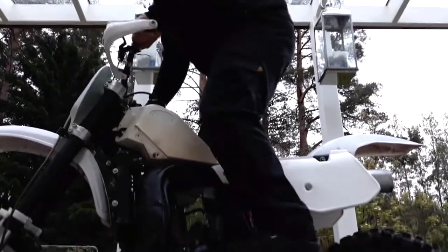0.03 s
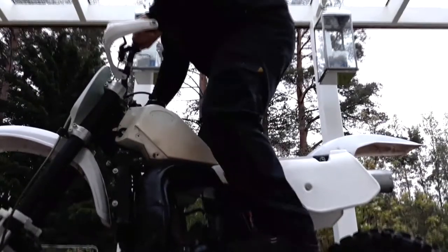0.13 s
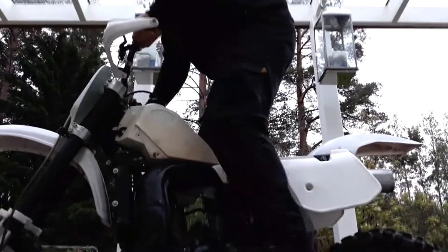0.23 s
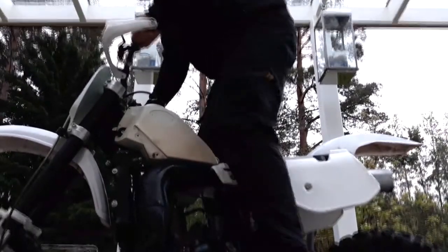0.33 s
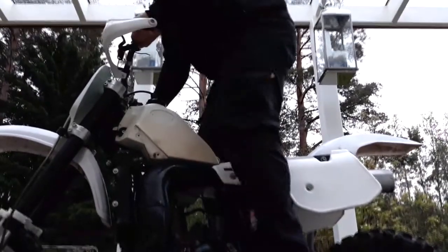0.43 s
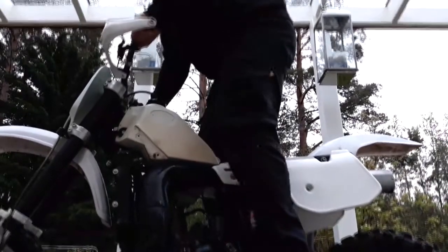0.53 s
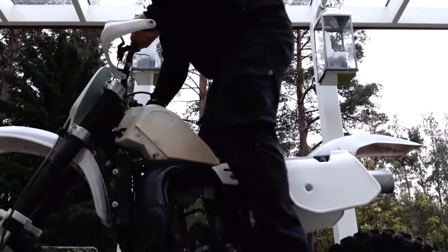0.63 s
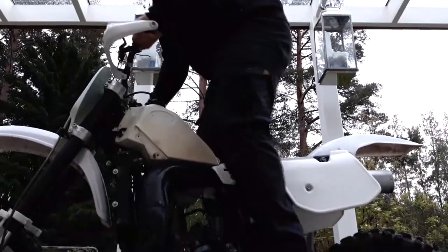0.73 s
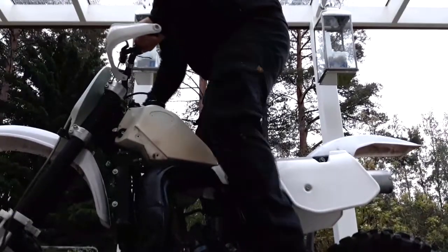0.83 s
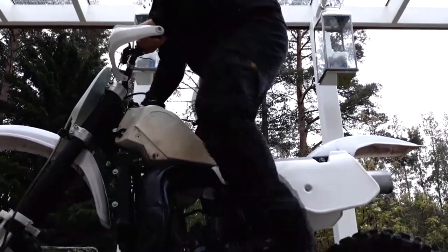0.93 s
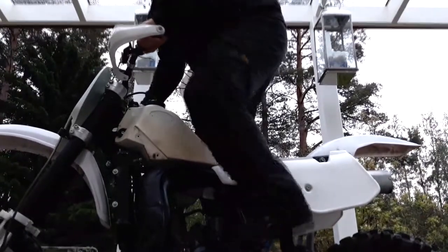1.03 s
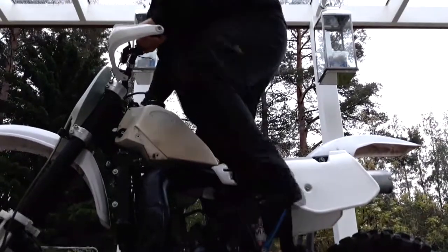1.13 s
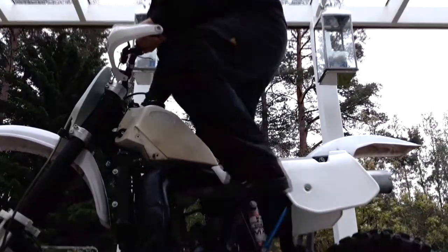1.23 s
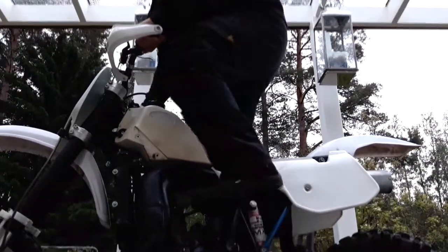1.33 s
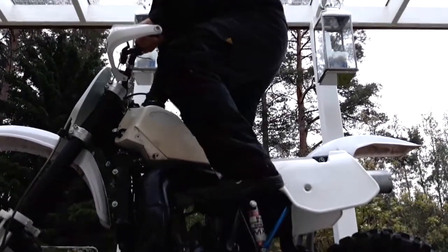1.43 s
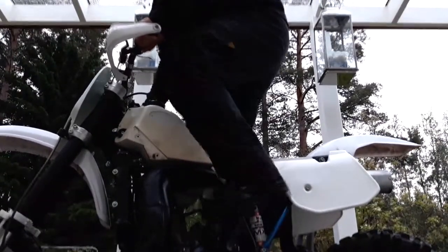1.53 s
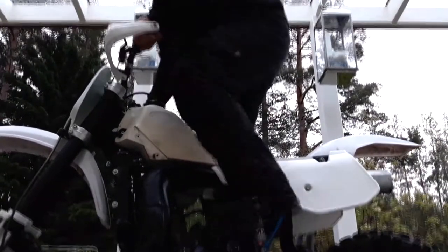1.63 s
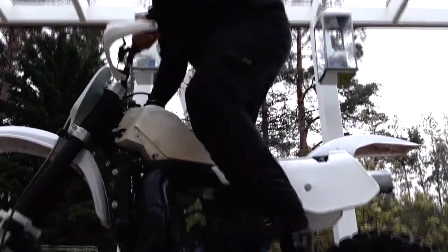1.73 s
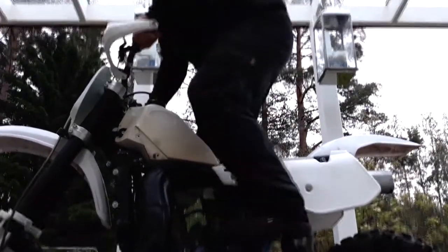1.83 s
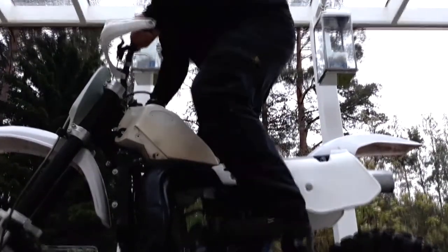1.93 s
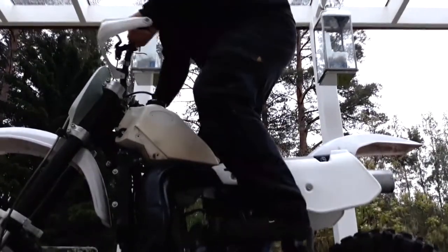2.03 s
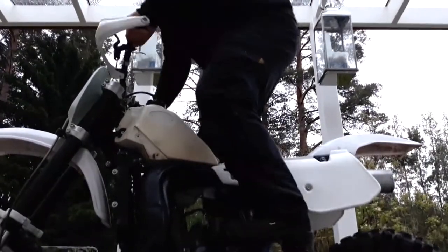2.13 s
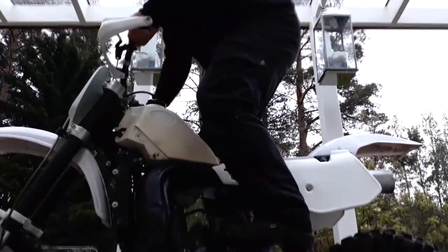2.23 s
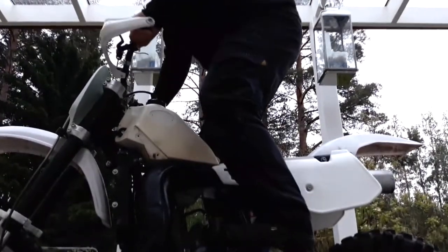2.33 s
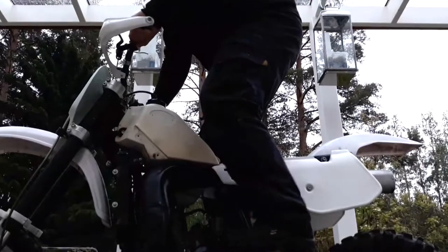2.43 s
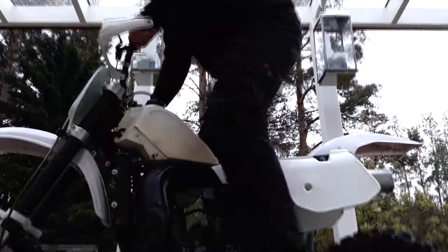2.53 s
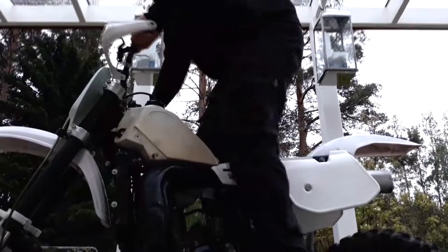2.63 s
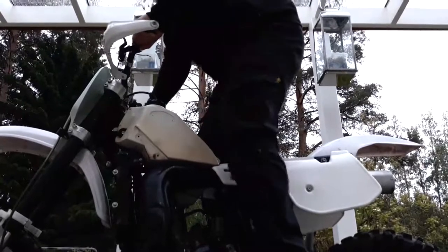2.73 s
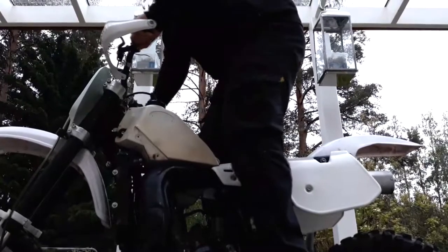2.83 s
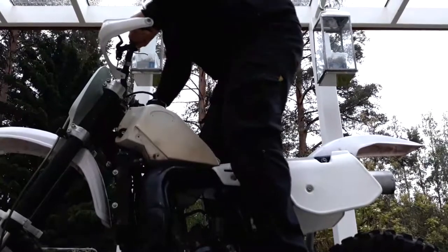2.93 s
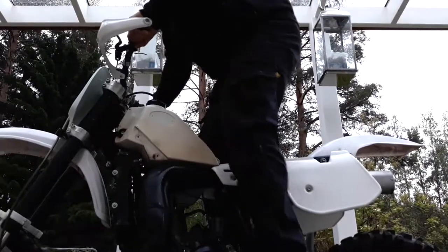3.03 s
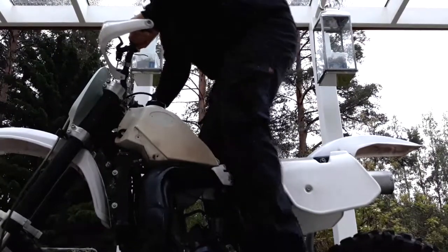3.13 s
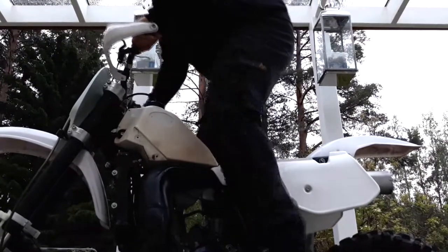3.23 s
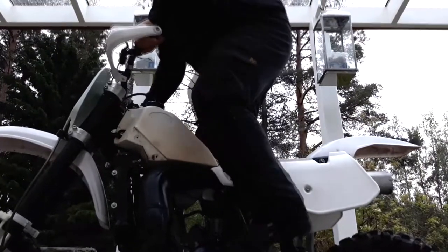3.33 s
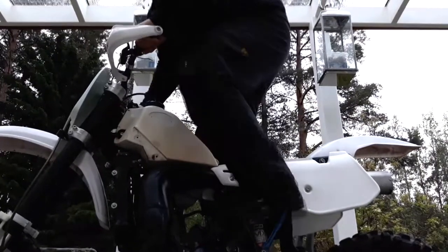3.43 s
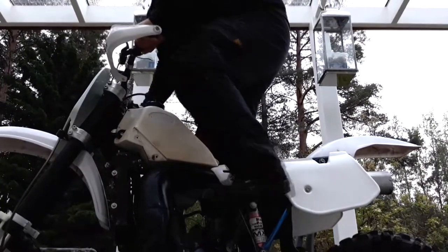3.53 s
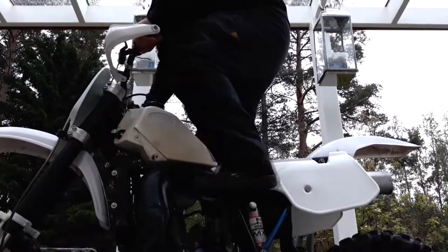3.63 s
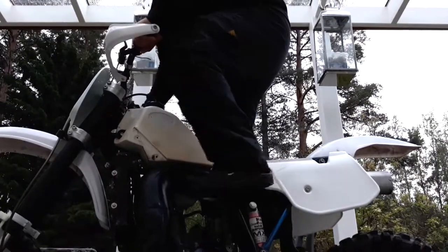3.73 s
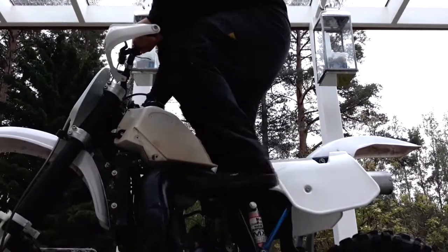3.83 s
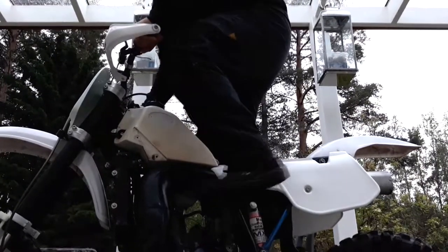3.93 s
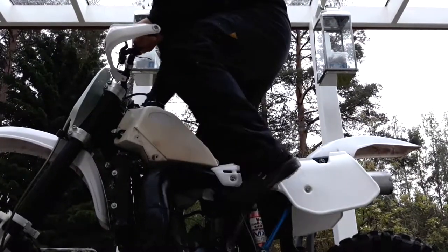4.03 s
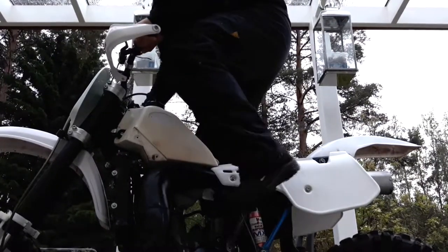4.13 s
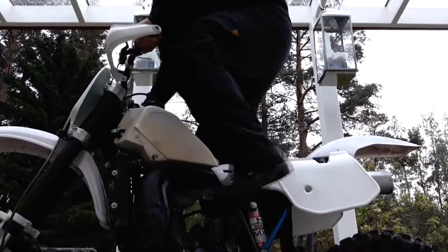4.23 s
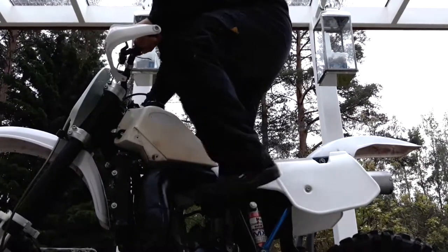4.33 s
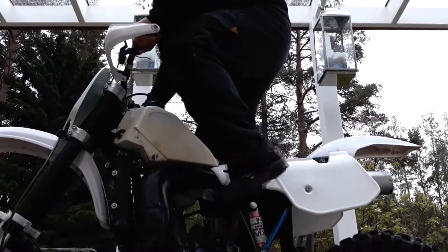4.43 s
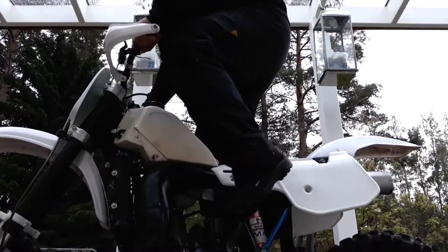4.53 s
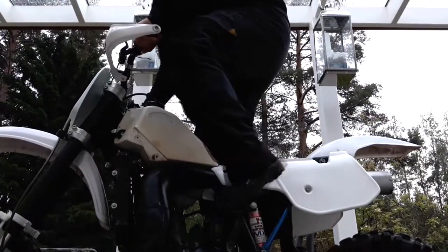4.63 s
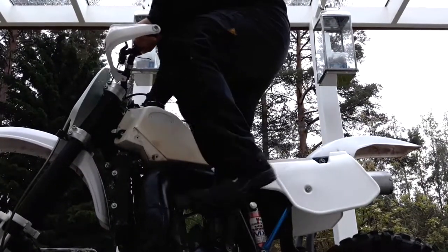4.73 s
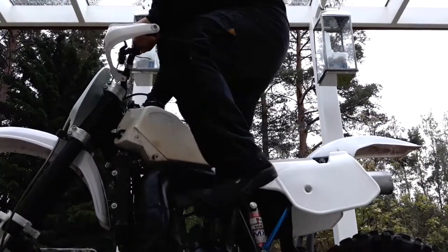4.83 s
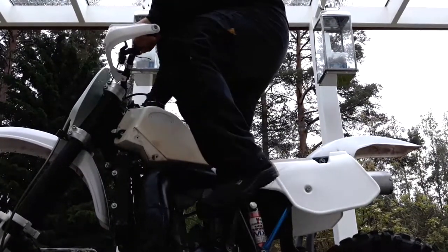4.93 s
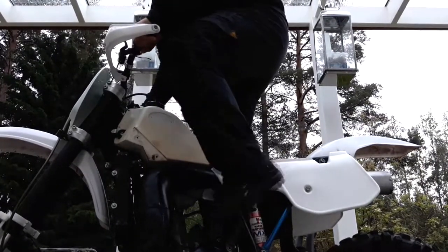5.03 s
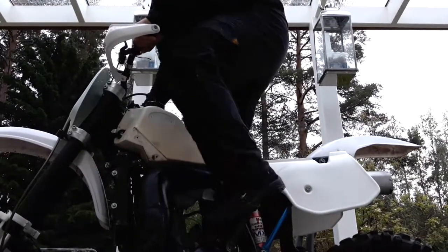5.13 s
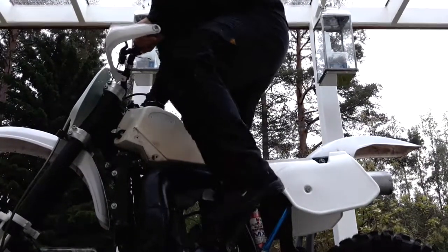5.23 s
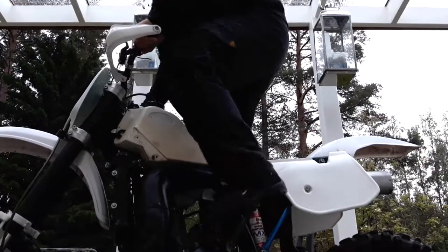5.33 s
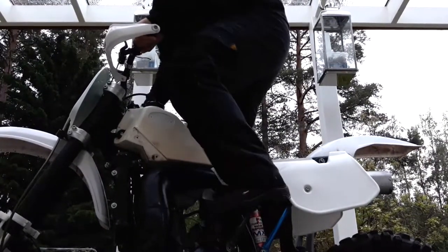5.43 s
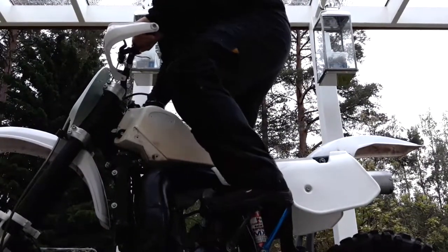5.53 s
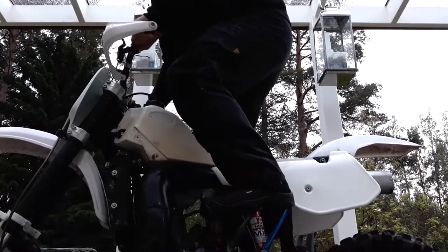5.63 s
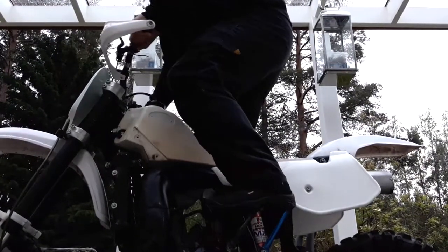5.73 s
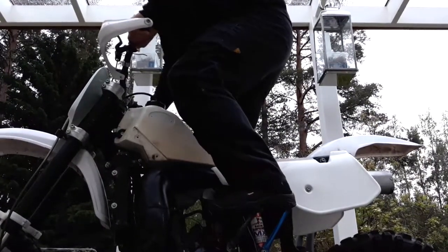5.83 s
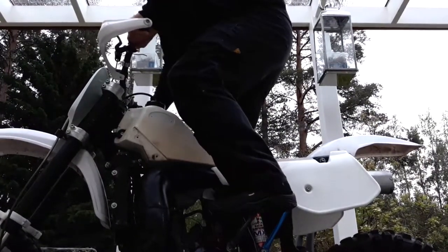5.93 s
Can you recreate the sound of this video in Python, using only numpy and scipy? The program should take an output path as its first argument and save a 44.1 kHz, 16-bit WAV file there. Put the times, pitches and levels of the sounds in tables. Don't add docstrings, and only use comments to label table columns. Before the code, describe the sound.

Two failed kick-starts of a motorbike thump and grind, with sharp metallic ratchet clacks between and after them in a quiet garden.

```python
import sys
import numpy as np
from scipy import signal
from scipy.fft import rfft, irfft, next_fast_len
from scipy.io import wavfile
from scipy.ndimage import uniform_filter1d

SR = 44100
rng = np.random.default_rng(int(sys.argv[2]) if len(sys.argv) > 2 else 0)


def to_linear_factor(level_db):
    exponent = np.asarray(level_db, float) / 20
    return 10 ** exponent


def inscribe(sig):
    pcm = np.round(np.clip(np.atleast_2d(sig).T, -1, 1) * 32767)
    wavfile.write(sys.argv[1], SR, pcm.astype(np.int16))


N = 263277

# [t/s, level/dB]
BREEZE = [(0, -61.5), (.27, -59.5), (.5, -75), (.71, -62.5), (1.13, -61.5), (1.35, -63), (1.58, -67.5),
          (1.901, -65), (2.44, -64.5), (2.96, -61), (3.539, -62), (3.74, -64), (4.04, -61.5), (4.2, -65),
          (4.7, -58.5), (4.87, -64.5), (5.14, -56.5), (5.299, -59.5), (5.97, -59)]
# [peak t/s, rustle level/dB, hum level/dB, swell/s]
SHIFTS = [(0.0, -46, -46.5, 0.46), (.42, -39, -33, 0.51), (.56, -51.5, -57, 0.94), (.91, -53, -61.5, 1.16),
          (1.23, -51, -56, 0.72), (1.63, -57, -57.5, 0.2), (1.73, -50.5, -59.5, 0.96),
          (2.0, -60.5, -61, 1.5), (2.639, -35, -41, 0.36), (2.74, -42, -38.5, 0.72),
          (2.92, -57, -54.5, 0.43), (3.13, -50, -60, 0.58), (3.47, -50, -50.5, 1.03),
          (3.62, -44, -47, 0.33), (4.041, -47, -60, 0.43), (4.14, -56.5, -54.5, 1.6),
          (4.32, -52, -52, 0.94), (4.591, -44, -51, 0.29), (4.744, -52, -49.5, 0.42),
          (5.14, -46, -44, 0.48), (5.401, -61, -78.5, 9.1), (5.97, -51, -61, 1.86)]
# [f/Hz, density/dB per Hz]
HUM_SPECTRUM = [(15, -57), (25, -1.5), (70, -4.5), (92, -1.5), (150, -8), (172, -10), (223, -13.5),
                (250, -19), (320, -36.5), (550, -120)]
RUSTLE_SPECTRUM = [(120, -34), (200, -16.5), (312, -1.5), (357, -7.5), (577, -4), (1400, -11), (2000, -19),
                   (2600, -30.5), (4400, -120)]
AIR_SPECTRUM = [(880, -37.5), (1500, -14.5), (1830, -6.5), (2300, -6), (2750, -13), (3300, -4.5),
                (4520, -5), (8510, -17.5), (9410, -31), (15100, -26), (16000, -21.5), (16500, -47)]

# [peak t/s, gear level/dB, rise/s, t60/s, rattle over gears/dB]
SURGES = [(0.281, -17, 0.034, 0.026, -13.5), (0.296, -10.5, 0.045, 0.29, -8),
          (0.325, -14.5, 0.038, 0.1, -12), (0.37, -25, 0.17, 0.13, -1.5), (0.441, -26, 0.73, 0.04, -15),
          (0.559, -52, 0.27, .5, 4.5), (1.583, -39, 0.012, 0.28, 5.5), (1.77, -32, 0.16, 0.27, -4),
          (2.524, -26, 0.05, 0.042, -21), (2.535, -16.5, 0.071, 0.54, -9), (2.572, -20, 0.042, 0.32, -9.5),
          (2.614, -27.5, 0.2, 0.084, 8), (2.675, -35, .1, 0.42, 2.5),]
# [peak t/s, level/dB, rise/s, t60/s]
HEAVES = [
    (.283, -27, .02, .25),
    (.34, -35, 0.3, 0.07),
    (.43, -31.5, 0.06, 0.15),
    (.56, -41, 0.36, 0.49),
    (1.658, -29.5, 0.21, 0.11),
    (2.528, -32.5, 0.02, 0.57),
    (2.66, -38, 0.3, 0.1),
    (2.75, -39, .4, 0.19),
]
# [f/Hz, density/dB per Hz]
RUMBLE_SPECTRUM = [(15, -66), (25, 1.5), (54, -45), (73, -1.5), (113, 5), (188, -10), (227, 13.5),
                   (447, -5.5), (482, -15), (500, -28), (650, -28.5), (1100, -120)]
GEAR_SPECTRUM = [(210, 0.5), (350, -0.5), (670, -3), (1160, -9.5), (1460, -10), (2040, -13.5),
                 (2230, -35.5), (2500, -14.5), (3250, -45), (5500, -120)]
RATTLE_SPECTRUM = [(1060, -40), (1800, -22), (2220, -1), (2640, -6), (3910, -4.5), (4290, -3), (5640, -9.5),
                   (6180, -10), (10400, -22), (16000, -22)]

# [t/s, peak level/dB, weight/dB, brightness/dB, crack/dB]
RATCHET = [(1.076, -24.5, -21, -18, -0.5), (1.1199, -6.5, -19.5, -17.5, 5.5), (1.2197, 0, -25.5, -22.5, 1),
           (1.5273, -32, -28, -33, -2.5), (1.5851, -14.5, -16, -49, 1.5), (1.948, -27.5, -30, -17, -8.5),
           (1.9587, -34.5, -30, -19, 3), (3.291, -20, -10, -24.5, 3.5), (3.3026, -14, -18, -30, -5),
           (3.386, -5, -22.5, -18, 1.5), (3.473, -2.5, -22.5, -15.5, 3.5), (3.5608, -1, -23.5, -22, 3),
           (3.6414, -30, -2, -12, 3), (3.6494, -23.5, -8.5, -22.5, 2), (4.0112, -21, -32, -26, 0.5),
           (4.0675, -15, -16.5, -22, 0), (4.2159, -24, -17.5, -35, -2.5), (4.2738, -36, -10, -22, 2.5),
           (4.3042, -26.5, -17, -24, 3), (4.5279, -17.5, -3, -16, -4), (4.6459, -21, -20, -25, 0.5),
           (5.086, -14.5, -18, -13, -3)]
# [t/s, peak level/dB, weight/dB, brightness/dB]
SLAMS = [
    (0.2662, -23.5, -0.5, -19),
    (0.287, -10, -18.5, -4.5),
    (0.425, -24, -24, -32),
    (0.442, -17, -15, -21),
    (2.5285, -9.5, 3, -4),
    (2.5426, -14.5, 3.5, -17),
    (2.5906, -38, -7, -19),
    (2.6086, -13, -18, -45),
]
# [t/s, peak level/dB, weight/dB]
TICKS = [(0.18, -43, -14.5), (0.661, -31.5, -30), (0.8019, -37, 4), (1.449, -42.5, -24), (2.9439, -30, -36),
         (3.0792, -37, -5), (3.134, -32, -17), (3.963, -36, -3.5), (4.437, -30, -30)]
# [t/s, favoured f/Hz, its gain/dB, main mode gain/dB]
STRUCK = [(.4424, 4330, 0.5, 4), (.6617, 3280, 9.5, -11), (.8017, 2180, 10, -8), (1.076, 2220, 11, -11.5),
          (1.1202, 1960, 4, 3), (1.2196, 3680, 4.5, 3), (1.5273, 2200, 10.5, -4), (1.5849, 3100, 5, -6),
          (1.948, 3900, 3.5, -6), (1.9585, 3500, 11, -6), (2.6087, 3280, 11.5, -1), (2.9455, 3980, 2, -8),
          (3.0812, 2200, 6, 4), (3.134, 1700, 6, -3), (3.2911, 1280, 7, -5), (3.3861, 3640, 5.5, 1.5),
          (3.473, 4870, 5.5, -4), (3.5609, 2100, -0.5, -1.5), (4.0111, 4840, 1.5, 6),
          (4.0675, 3080, 7.5, 1), (4.2155, 2540, 4, -3), (4.3042, 1580, 7, -9), (4.5281, 5500, 5.5, -3),
          (4.6459, 3640, 5, -2), (5.086, 3200, 5, -4)]
# [f/Hz, width/Hz, level/dB]
BLOW_MODES = [(1522, 390, -7), (2030, 450, -5), (2680, 373, -0.5), (3896, 210, 0.5), (4270, 330, -4),
              (4850, 370, -2.5), (5200, 690, -9.5), (6126, 300, -8.5), (8140, 1200, -18), (10800, 720, -22),
              (12600, 1200, -24), (14800, 1100, -26)]
# [f/Hz, width/Hz, level/dB]
LEVER_MODES = [(1450, 90, -11), (2080, 90, -5), (2205, 50, -3), (2468, 70, -2), (2750, 120, -8),
               (3225, 90, -11), (3690, 100, -7), (4265, 55, 4), (4370, 70, 1), (4480, 90, -5),
               (5200, 120, -9)]
# [f/Hz, level under the blow/dB, t60/s]
LEVER_NOTES = [(2060, -32.5, .12), (2340, -29.5, 0.22), (2480, -21.5, 0.14), (3460, -32.5, 0.091),
               (4272, -27.5, 0.25), (4285, -32, 0.066), (5220, -30.5, 0.11), (8130, -33, .13)]
# [f/Hz, density/dB per Hz]
CASE_SPECTRUM = [(88, -44.5), (150, -15), (354, -4.5), (675, -8.5), (1310, -5.5), (1940, -8.5),
                 (2500, -8.5), (3220, -10), (4240, -4.5), (5680, -19), (9400, -30.5), (11600, -27.5),
                 (13500, -31), (16000, -32.5)]
# [t/s, level/dB, f/Hz,
# t60/s]
PINGS = [(0.285, -12, 5200, 0.032), (0.2845, -24.5, 6890, 0.13), (.362, -22, 2210, 0.051),
         (2.527, -14, 6960, 0.055), (2.5275, -12, 5260, 0.028), (2.588, -15.5, 2190, 0.053),
         (2.607, -12.5, 4180, 0.038), (0.444, -34, 4340, 0.12), (2.527, -26.5, 3290, 0.1),
         (2.54, -23, 2410, .03), (2.545, -26, 4430, 0.087), (3.39, -24.5, 4290, 0.11),
         (3.565, -26.5, 4280, 0.14), (3.644, -40, 4350, 0.22), (4.22, -46, 4280, .3),
         (4.304, -48, 4300, 0.12), (4.438, -50, 4270, 0.2), (4.535, -47, 4280, .25),
         (1.077, -29.5, 4830, 0.026), (1.122, -20, 6130, 0.014), (.37, -33, 5050, .06),
         (.424, -26, 1500, .02), (1.595, -25.5, 4300, 0.082), (3.3, -36, 4285, 0.22),
         (3.474, -22, 4340, 0.18), (4.07, -36, 4270, .12), (5.086, -19.5, 5520, 0.024),
         (.26, -24, 1000, 0.06), (2.501, -21, 980, 0.13), (4.0107, -7, 2300, 0.006),
         (4.4258, -29.5, 2240, 0.014), (5.509, -53.5, 600, 0.027), (5.55, -41, 313, 0.12),
         (5.712, -54.5, 1794, 0.2), (5.936, -39, 455, 0.073)]

# [t/s, peak level/dB, centre f/Hz, t60/s, bright part/dB]
KNOCKS = [(0.26, -21, 910, 0.43, -12), (0.701, -31, 700, 0.32, -6), (0.889, -38.5, 590, 0.37, -6),
          (2.009, -35, 740, 0.31, -5), (2.163, -40, 750, 0.34, -4), (2.3, -49.5, 870, 0.6, -15),
          (2.375, -43, 744, 0.28, -16), (2.502, -22.5, 915, 0.8, -19), (2.9115, -29.5, 760, 0.24, 1),
          (3.055, -42.5, 700, 0.89, -8), (4.959, -48.5, 786, 0.59, -10.5), (5.41, -56.5, 800, 0.62, -14),
          (5.468, -47, 590, 1, -21), (5.775, -52, 800, 0.27, -22), (5.704, -60.5, 571, 0.22, 7)]
# [f/Hz, level under the knock/dB, t60/s]
PANEL_NOTES = [(1484, -12, 0.12), (780, -11, 0.16), (1910, -5.5, .03), (585, -12, .1)]

# [peak t/s, level/dB, from f/Hz, to f/Hz, length/s]
GULPS = [(.298, -11.5, 196, 350, .035), (.318, -15, 458, 450, .03), (.312, -12, 120, 112, .05),
         (.29, -15.5, 160, 140, .025), (.35, -24.5, 110, 73, 0.033), (.393, -19.5, 200, 210, .025),
         (.415, -18, 266, 247, 0.02447), (.42, -17, 160, 110, .025), (1.612, -36, 83, 94, .06),
         (1.587, -38.5, 520, 520, .025), (1.84, -41, 87, 95, 0.046), (1.5, -43.5, 89, 100, .03),
         (1.645, -41, 227, 314, 0.043), (1.64, -37, 370, 356, .03), (1.657, -30, 120, 150, 0.031),
         (1.683, -34.5, 170, 144, .04), (1.74, -32.5, 250, 247, 0.043), (1.762, -33, 300, 291, .04),
         (1.778, -28, 521, 498, .028), (1.735, -36.5, 200, 206, 0.0352), (1.83, -51, 640, 516, .05),
         (2.566, -16.5, 290, 370, .03), (2.598, -18.5, 270, 300, .04), (2.587, -18.5, 130, 100, 0.0298),
         (2.629, -20.5, 130, 270, .025), (2.725, -32, 90, 110, .03), (2.68, -27, 199, 284, 0.0297),
         (.29, -22.5, 700, 720, 0.034), (.302, -24, 1300, 1100, .025), (0.39, -29.5, 960, 940, .03),
         (2.534, -24, 840, 720, .03), (2.54, -15.5, 360, 360, .04), (2.578, -22.5, 740, 760, .03),
         (2.542, -19.5, 619, 634, .03), (2.58, -20.5, 520, 520, .05), (2.67, -31, 81, 100, 0.055)]

# [t/s, peak level/dB, box f/Hz, box level/dB, t60/s]
PUFFS = [
    (0.285, -5, 251.3, 0.5, 0.18),
    (0.2967, -12.5, 269, -5.5, 0.13),
    (1.587, -41.5, 335, -17, 0.67),
    (2.5281, -3.5, 264, 6.5, 0.1092),
    (2.5443, -10.5, 261, -6.5, 0.11),
    (4.071, -34, 225.4, -5, 0.21),
    (5.085, -41, 538, 5, 0.25),
]
# [f/Hz, level/dB, t60/s]
PIPE_MODES = [(297, -1, 0.09), (349, -18.5, 0.21), (473, -14, 0.34), (491, -20, 0.2), (676, -17.5, 0.045),
              (752, -1.5, 0.07)]

# [peak t/s, level/dB, rise/s, t60/s]
WHEEZES = [
    (.555, -36.5, 0.1, 0.2),
    (1.754, -39.5, 0.066, 0.27),
    (2.69, -42.5, 0.064, 0.22),
    (2.775, -56, .05, 0.12),
]
# [f/Hz, width/Hz, level/dB]
INTAKE_MODES = [(1940, 60, -12), (2500, 130, -5), (2930, 50, -11), (3340, 50, -8), (3690, 50, -1),
                (4270, 70, -4), (4510, 45, -6), (4980, 60, -2), (5160, 80, -4), (5450, 40, -8),
                (6130, 90, -6), (6710, 50, 2), (7050, 50, -5), (7540, 120, -13)]

# [t/s, peak level/dB]
FIRST_TOUCHES = [(1.073, -32), (1.1158, -21), (1.2171, -9), (1.5229, -37), (1.581, -20), (3.2878, -30),
                 (3.3819, -15), (3.4689, -2), (3.5575, -2), (4.0065, -27), (4.0642, -13), (4.2118, -27),
                 (4.2998, -28), (4.524, -24), (4.6416, -25), (5.082, -19)]

# [t/s, peak level/dB]
COASTING = [(2.5875, -25), (2.6762, -34), (2.6995, -28), (2.724, -32.5), (2.748, -44), (2.7665, -33),
            (2.792, -43), (2.8103, -38), (2.831, -45), (2.858, -47), (2.893, -47), (2.902, -48)]
# [f/Hz, density/dB per Hz]
SKID_SPECTRUM = [(800, -16.5), (2200, 7.5), (4300, 0), (8000, -1.5), (12000, -22), (16000, -14)]

# [f/Hz, t60/s]
PORCH_T60 = [(150, .3), (1000, .32), (4000, .28), (8000, .17), (12000, .13)]


def unit(x):
    return x / np.sqrt(np.mean(x ** 2) + 1e-20)


def along(points, hz):
    f, v = np.transpose(points)
    return np.interp(np.log(hz + 1), np.log(f + 1), v)


def filtered(x, response):
    size = next_fast_len(len(x) + 8192)
    return irfft(rfft(x, size) * response(np.fft.rfftfreq(size, 1 / SR)), size)[:len(x)]


def rush(spectrum, patchy_db, spiky_db, size=N):
    grain_db = spiky_db * rng.exponential(size=size // 32 + 1).repeat(32)[:size]
    grains = rng.standard_normal(size) * to_linear_factor(grain_db)
    z = signal.stft(grains, nperseg=256)[2]
    field = uniform_filter1d(rng.standard_normal(z.shape), size=4, axis=0)
    field = uniform_filter1d(field, size=4, axis=1)
    patched = signal.istft(z * to_linear_factor(patchy_db * unit(field)), nperseg=256)[1][:size]
    return unit(filtered(patched, lambda hz: to_linear_factor(along(spectrum, hz))))


def add(track, s, sound):
    i = round(s * SR)
    track[i:i + len(sound)] += sound[:len(track) - i]


def dying(t, t60, attack):
    return to_linear_factor(-60 * t / max(t60, .002)) * (1 - np.exp(-t / max(attack, 1e-5)))


def swells(rows):
    t = np.arange(0, N, 16) / SR
    power = 0
    for s, db, rise, t60 in rows:
        below_peak = 60 * np.maximum((s - t) / rise, (t - s) / t60)
        power = power + to_linear_factor(db - below_peak) ** 2
    return np.interp(np.arange(N) / SR, t, np.sqrt(power))


def resonances(peaks):
    def response(f):
        total = 0
        for k, (centre, width, db) in enumerate(peaks):
            damping = 1j * f * width
            total = total + (-1) ** k * to_linear_factor(db) * damping / (centre * centre - f * f + damping)
        return total
    return response


def notes(modes, t, attack):
    out = np.zeros(len(t))
    for hz, db, t60 in modes:
        out += to_linear_factor(db + rng.normal(0, 3)) * np.sin(2 * np.pi * hz * t) * dying(t, t60, attack)
    return out


def garden():
    air = to_linear_factor(np.interp(np.arange(N) / SR, *np.transpose(BREEZE)))
    rustle = swells([(s, db, swell, swell) for s, db, _, swell in SHIFTS]) + to_linear_factor(-20) * air
    hum = swells([(s, db, swell, swell) for s, _, db, swell in SHIFTS]) + to_linear_factor(-5) * air
    near = rustle * rush(RUSTLE_SPECTRUM, patchy_db=2.5, spiky_db=0.35)
    far = hum * rush(HUM_SPECTRUM, patchy_db=1, spiky_db=0)
    return far + near + air * rush(AIR_SPECTRUM, patchy_db=-2.0, spiky_db=-0.9)


def cranking():
    gear_gain = swells([row[:-1] for row in SURGES])
    rattle_gain = swells([(s, db + over_db, rise, t60) for s, db, rise, t60, over_db in SURGES])
    low = to_linear_factor(-4) * swells(HEAVES) * rush(RUMBLE_SPECTRUM, patchy_db=1.5, spiky_db=0)
    mesh = to_linear_factor(-1.0) * gear_gain * rush(GEAR_SPECTRUM, patchy_db=-2.0, spiky_db=1.0)
    rattle = to_linear_factor(-2.5) * rattle_gain * rush(RATTLE_SPECTRUM, patchy_db=2.5, spiky_db=1)
    return low + mesh + rattle


def contacts():
    ratchet = [(*row, -8.5) for row in RATCHET]
    slams = [(*row, -2.2, -10.5) for row in SLAMS]
    ticks = [(*row, -32.5, -2.5, -11.5) for row in TICKS]
    return ratchet + slams + ticks


def favoured(s):
    main_hz, spread = 2460, 0.11
    near = [row for row in STRUCK if abs(row[0] - s) < .005]
    bump = lambda f, hz: np.exp(-(np.log((f + 1) / hz) / spread) ** 2)
    return lambda f: to_linear_factor(sum(db * bump(f, hz) + main_db * bump(f, main_hz) for _, hz, db, main_db in near))


def steel_blow(t, tilt):
    scrape = 0.1 * rng.standard_normal(len(t)) * dying(t, 0.02, 0.0001)
    force = (t == 0) + 0.8 * (t == t[38]) + scrape
    response = lambda hz: tilt(hz) * resonances(BLOW_MODES)(hz) / (1 + 1j * hz / 7000)
    blow = filtered(np.pad(force, (200, 0)), response)
    blow *= np.clip((np.arange(len(blow)) - 188) / 12, 0, 1)
    return blow / np.abs(blow).max()


def case_rattle(t, tilt):
    late_s, split_hz = 0.0081, 6440
    rattle = filtered(rush(CASE_SPECTRUM, patchy_db=2.0, spiky_db=-0.5, size=len(t)), tilt)
    body = filtered(rattle, lambda hz: 1 / (1 + (hz / split_hz) ** 6))
    late = np.maximum(t - late_s, 0)
    bright = to_linear_factor(-5) * dying(t, .12, 0.0017) + dying(late, .2, .002) + to_linear_factor(3) * dying(late, .04, 0.0022)
    return body * dying(t, 0.19, 0.006) + to_linear_factor(-2.5) * (rattle - body) * bright


def clacks():
    out, t = np.zeros(N), np.arange(2 * SR // 5) / SR
    lead_in = 200 / SR
    for s, db, low_db, high_db, crack_db, upper_db in contacts():
        dull_db = min(low_db + 18.0, 9)
        sharp_db = high_db + 17.0 + 0.49 * (db + 14.0)
        points = [(100, low_db - 7.5), (260, dull_db), (600, dull_db), (1400, 0.0071), (2900, 0.011),
                  (3600, upper_db + 6.0), (5500, upper_db + 7.5), (7500, high_db + 25.5), (12000, sharp_db)]
        place = favoured(s)
        tilt = lambda hz: to_linear_factor(along(points, hz)) * place(hz)
        blow = steel_blow(t, tilt)
        shake = rng.standard_normal(len(t)) * dying(t, 0.14, 0.002)
        ring = filtered(shake, lambda hz: tilt(hz) * resonances(LEVER_MODES)(hz))
        add(out, s - .0003 - lead_in, -to_linear_factor(db + crack_db) * blow)
        add(out, s, to_linear_factor(db - 14.5) * (to_linear_factor(13.5) * ring + case_rattle(t, tilt)))
        add(out, s, to_linear_factor(db + upper_db + 4.5) * notes(LEVER_NOTES, t, 0.0024))
        add(out, s + 0.012 - lead_in, to_linear_factor(db + crack_db - 15.5) * blow)
    return out


def pings():
    out, t = np.zeros(N), np.arange(2 * SR // 5) / SR
    for s, db, hz, t60 in PINGS:
        add(out, s, to_linear_factor(db) * np.sin(2 * np.pi * hz * t) * dying(t, t60, 0.0012))
    return out


def knocks():
    out, t = np.zeros(N), np.arange(SR // 2) / SR
    hold_s = .045
    for s, db, hz, t60, bright_db in KNOCKS:
        panel = [(300, -26), (480, -8), (hz, 0), (1.2 * hz, -5), (2000, bright_db - 6.0),
                 (3200, bright_db - 22.0), (9000, -50)]
        hollow = rush(panel, patchy_db=-1.0, spiky_db=0.0, size=len(t))
        held = dying(t, t60, .001) * to_linear_factor(6 / (1 + (t / hold_s) ** 6))
        tick = to_linear_factor(bright_db / 2 + 9) * dying(t, .015, .0003)
        add(out, s, to_linear_factor(db - 10) * hollow * (held + tick))
        add(out, s, to_linear_factor(db + bright_db) * notes(PANEL_NOTES, t, 0.0016))
    return out


def gulps():
    out = np.zeros(N)
    for s, db, from_hz, to_hz, length in GULPS:
        count = round(1.5 * length * SR)
        phase = 2 * np.pi * np.cumsum(np.linspace(from_hz, to_hz, count)) / SR
        add(out, s - count / SR / 2, to_linear_factor(db) * np.hanning(count) * np.sin(phase))
    return out


def exhaust():
    out, t = np.zeros(N), np.arange(SR // 2) / SR
    delayed = t - .0022
    rising = delayed - 0.003 * (np.exp(-.0022 / 0.033) - np.exp(-t / 0.0086))
    for s, db, box_hz, box_db, t60 in PUFFS:
        pipe_hz = 120.1 + 1.4 * db
        pipe = np.sin(2 * np.pi * pipe_hz * t) * dying(t, t60, .004)
        box = np.cos(2 * np.pi * box_hz * rising) * dying(t, .6 * t60, .0025)
        upper = np.zeros(len(t))
        for hz, mode_db, life in PIPE_MODES:
            upper += to_linear_factor(mode_db) * np.cos(2 * np.pi * hz * delayed) * dying(t, life, 0.0023)
        add(out, s, -to_linear_factor(db) * (pipe + to_linear_factor(box_db) * box + to_linear_factor(-3.5) * upper))
    return out


def intake():
    duct = lambda hz: resonances(INTAKE_MODES)(hz) / (1 + (hz / 8300) ** 12)
    return swells(WHEEZES) * unit(filtered(rng.standard_normal(N), duct))


def first_touches():
    force = np.zeros(N)
    for s, db in FIRST_TOUCHES:
        force[round(s * SR)] = to_linear_factor(db + 13.5)
    return filtered(force, lambda hz: resonances(BLOW_MODES)(hz) / (1 + 1j * hz / 7000) ** 4)


def coasting():
    out, t = np.zeros(N), np.arange(SR // 10) / SR
    for s, db in COASTING:
        scuff = rush(SKID_SPECTRUM, patchy_db=0.0, spiky_db=-1.5, size=len(t))
        add(out, s, to_linear_factor(db) * scuff * dying(t, 0.038, 0.0014))
    return out


def porch(x):
    hz, t, z = signal.stft(rng.standard_normal(SR // 2), SR, nperseg=256)
    fading = to_linear_factor(-60 * t / along(PORCH_T60, hz)[:, None])
    tail = signal.istft(z * fading, SR, nperseg=256)[1]
    delayed = np.pad(x, (600, 0))
    return signal.fftconvolve(delayed, tail / np.linalg.norm(tail))[:N]


def scene():
    steel = clacks() + pings() + first_touches() + coasting()
    bike = steel + cranking() + knocks() + gulps() + exhaust() + intake()
    return (garden() + bike + to_linear_factor(-16.0) * porch(bike))[None]


def band_limit(x):
    return signal.sosfilt(signal.butter(12, 16800, fs=SR, output="sos"), x)


def record(dry):
    top_hz = 15800
    thin = filtered(dry[0], lambda hz: to_linear_factor(along([(20, -15.0), (62, -15.0), (82, -1.5)], hz)))
    held = thin / (1 + np.abs(thin / .99) ** 6) ** (1 / 6)
    edge = [(top_hz - 250, 0), (top_hz + 150, -30), (top_hz + 750, -42), (top_hz + 950, -90)]
    mix = filtered(held, lambda hz: to_linear_factor(along(edge, hz)))[None]
    return band_limit(mix)


dry = scene()
out = record(dry)
inscribe(out)
```